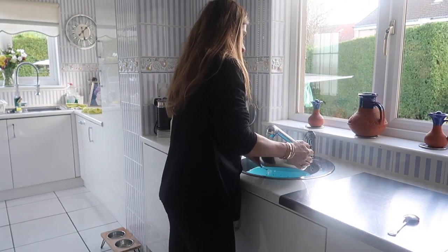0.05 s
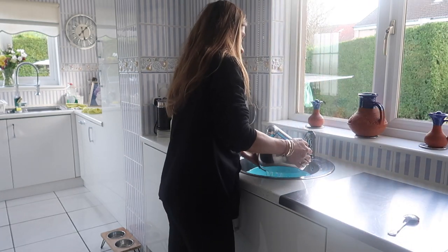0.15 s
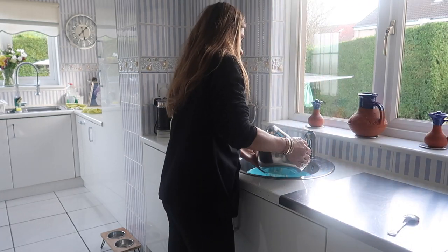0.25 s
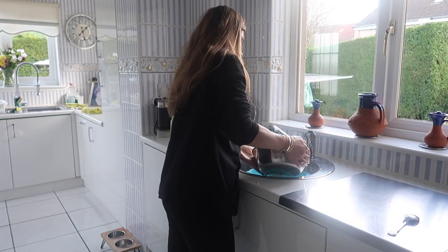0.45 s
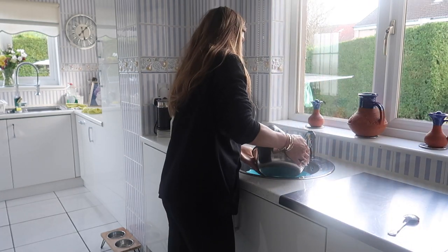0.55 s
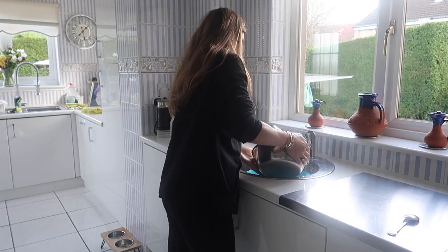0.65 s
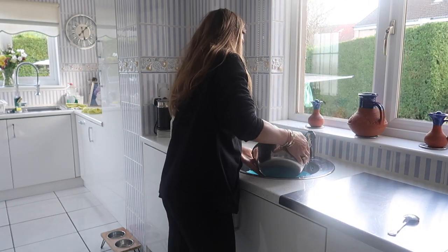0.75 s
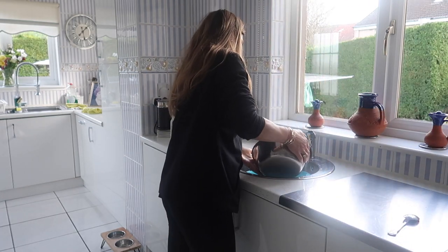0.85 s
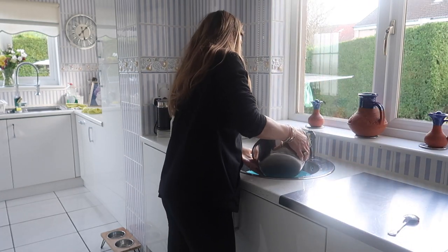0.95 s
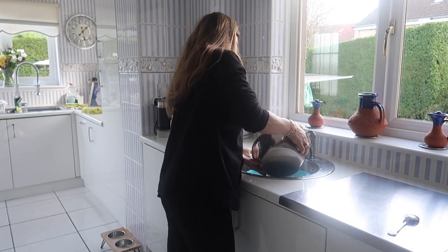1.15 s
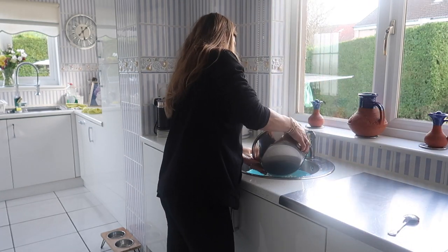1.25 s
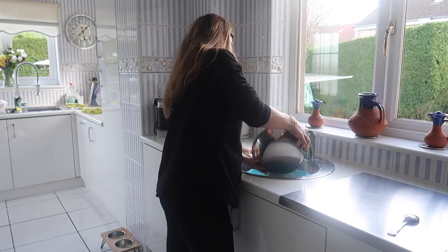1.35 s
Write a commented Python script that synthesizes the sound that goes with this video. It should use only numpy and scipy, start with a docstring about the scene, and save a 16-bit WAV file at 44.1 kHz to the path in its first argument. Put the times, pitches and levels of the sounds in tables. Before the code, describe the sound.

Beans pour with a sudden hard rattle that rings the steel, then thin to sparse knocks while water splashes and eases over the sink floor, with a last tiny tumble; close stereo pickup in a tiled kitchen.

```python
"""A faint mains hum and room noise lie under everything, from the start.
Soaked beans and water are then tipped from a steel bowl into a colander in a kitchen sink: dense knocks,
made of short random pings, ring the steel, while water fizzes, pops and drums on the sink floor.
The beans thin out and the water slowly eases, with a last small tumble of beans near the end.
Close-set microphones hear the bass alike and the treble apart."""
import sys
import numpy as np
from scipy import signal
from scipy.fft import rfft, irfft
from scipy.io import wavfile
from scipy.ndimage import uniform_filter1d, map_coordinates

SR = 44100
rng = np.random.default_rng(int(sys.argv[2]) if len(sys.argv) > 2 else 0)


def voltage_ratio(level):
    """Linear amplitude factor for a level in decibels (scalar or array-like)."""
    return 10 ** (np.asarray(level, float) / 20)


def file_out(sig):
    """Save sig as 16-bit WAV at sys.argv[1]."""
    # one column per channel
    cols = np.atleast_2d(sig).T
    # limit, then scale
    lim = np.clip(cols, -1, 1)
    pcm = np.round(lim * 32767).astype(np.int16)
    wavfile.write(sys.argv[1], SR, pcm)


N = 61739  # length in samples
SURGE_PER_S = 14  # new random levels each second, for slow surges


def unit(x):
    """Scale to rms 1."""
    return x / np.sqrt(np.mean(x ** 2))


def curve(table):
    """Gain over time, drawn through (time [s], level [dB]) points."""
    table = np.array(table)
    return voltage_ratio(np.interp(np.arange(N) / SR, table[:, 0], table[:, 1]))


def shape(table, hz):
    """Gain at a frequency, drawn through (frequency [Hz], level [dB]) points."""
    table = np.array(table)
    return voltage_ratio(np.interp(np.log(hz), np.log(table[:, 0]), table[:, 1]))


def colour(x, table):
    """Make some frequencies louder and others softer, as the table says."""
    hz = np.maximum(np.fft.rfftfreq(len(x), 1 / SR), 1)
    return irfft(rfft(x) * shape(table, hz), len(x))


def walk(per_s):
    """Random levels joined by straight slopes; spread near 1.5."""
    size = SR // int(per_s)
    levels = np.repeat(rng.standard_normal(N // size + 1), size)
    return 1.83 * uniform_filter1d(levels, size)[:N]


def burst(s, length_s):
    """Envelope that starts at s, swells to 1 after length_s and dies away."""
    age = np.maximum(np.arange(N) / SR - s, 0) / length_s
    return np.e * age * np.exp(-age)


def ring(x, hz, t60):
    """One mode, like a small bell: each impulse sets off a tone that falls 60 dB in t60 seconds."""
    pole = np.exp((2j * np.pi * hz - np.log(1000) / t60) / SR)
    return signal.lfilter([1], [1, -pole], x).imag


def impacts(per_s, scatter_db):
    """Random impulses, a few much stronger than the rest, and a lot 0-1 for each."""
    chance = rng.random((N, 3))
    sign = np.sign(chance[:, 1] * 1000 % 1 - .5)
    size = sign * voltage_ratio(-scatter_db * np.log(chance[:, 1] + 1e-9))
    return size * (chance[:, 0] < per_s / SR), chance[:, 2]


def grains(hits, lot, table, cycles, surge_db, count):
    """Every impulse rings for a few cycles at its own pitch; neighbouring pitches surge together."""
    surges = [walk(SURGE_PER_S) for _ in range(count // 8 + 2)]
    out = 0
    for k, hz in enumerate(np.geomspace(table[0][0], table[-1][0], count)):
        # each pitch blends the two nearest surges
        share = k % 8 / 8 * np.pi / 2
        blend = np.cos(share) * surges[k // 8] + np.sin(share) * surges[k // 8 + 1]
        mine = voltage_ratio(surge_db * blend) * hits * ((lot * count).astype(int) == k)
        t60 = np.log(1000) * cycles / (np.pi * hz)
        # ringing twice softens the start; hz ** 2 evens out the level
        ping = ring(ring(mine, hz, t60), hz, t60 / 2)
        out = out + shape(table, hz) * hz ** 2 * ping
    return unit(out)


def modes(hits, table):
    """Every impulse strikes at a new place, so each mode takes its own random share."""
    out = 0
    for hz, db, t60 in table:
        out = out + voltage_ratio(db) * ring(hits * rng.standard_normal(N), hz, t60) / np.sqrt(t60)
    return unit(out)


# tones of the mains hum: (frequency [Hz], level [dB rms])
HUM_TONES = [(50, -56), (100, -59), (297, -52.5)]
# colour of the room noise: (frequency [Hz], relative level [dB])
ROOM_NOISE_COLOUR = [(82, -62), (140, -8), (176, -16), (264, -9.5), (303, -5), (381, -20.5), (2620, -32),
                     (14000, -54)]


def kitchen():
    """Mains hum from steady sines, low rumble from noise through one mode, and coloured room noise."""
    noise_db, rumble_db = -49.5, -61  # rms levels
    t = np.arange(N) / SR
    hum = 0
    for hz, db in HUM_TONES:
        hum = hum + voltage_ratio(db) * np.sqrt(2) * np.sin(2 * np.pi * (hz * t + rng.random()))
    rumble = voltage_ratio(rumble_db) * unit(ring(rng.standard_normal(N), 55.5, 0.043))
    noise = voltage_ratio(noise_db) * unit(colour(rng.standard_normal(N), ROOM_NOISE_COLOUR))
    return hum + rumble + noise


# how hard the beans tumble: (time [s], level [dB])
TUMBLE_LEVEL = [(0.152, -66), (0.158, -42), (0.186, -43.5), (0.204, -15.5), (0.24, -13.5), (0.254, -28),
                (0.263, -12), (0.316, -13.5), (0.33, -15.5), (0.36, -13.5), (0.412, -14.5), (0.422, -14.5),
                (0.602, -16.5), (0.68, -22.5), (0.73, -26.5), (0.758, -24), (1.058, -33), (1.344, -35.5),
                (1.372, -25.5), (1.4, -36)]


def tumble():
    """Strength of the falling beans; it flickers because they leave the bowl unevenly."""
    trickle_db = 0.8  # depth of the flicker
    return curve(TUMBLE_LEVEL) * voltage_ratio(trickle_db * walk(60))


# colour of the bean knocks: (frequency [Hz], level [dB])
BEAN_COLOUR = [(350, -15), (520, -42), (650, -17), (850, -4), (1100, -11.5), (1450, -2), (2050, -5),
               (2700, -11), (3600, -25.5), (4500, -39.5)]


def bean_rattle(hits, lot, push):
    """Dense small knocks, each a ping of a few cycles at its own pitch."""
    return voltage_ratio(-4) * push * grains(hits, lot, BEAN_COLOUR, cycles=6, surge_db=.8, count=40)


# modes of bowl and colander: (frequency [Hz], level [dB], time to fall 60 dB [s])
STEEL_MODES = [(610, -6, 0.52), (687.4, -1.5, 0.21), (794, -7, 0.47), (908, -9, 0.12), (1161, -8, 0.74),
               (1282, -4, 0.18), (1382, 3, 0.22), (1460, 0, 0.53), (1699, -4.5, 0.29), (1841, 1.5, 0.018),
               (2060, -1, 0.041), (2106, -13, 0.54), (3430, -16.5, 0.13)]


def steel(hits, push):
    """The same knocks ring the natural tones of the steel."""
    return voltage_ratio(-6) * modes(hits * push, STEEL_MODES) * np.sqrt(np.mean(push ** 2))


def beans():
    """One shower of random impacts drives both the rattle and the ringing steel."""
    hits, lot = impacts(per_s=3300, scatter_db=1.9)
    push = tumble()
    return bean_rattle(hits, lot, push) + steel(hits, push)


# rush of the water: (time [s], level [dB])
FLOW_LEVEL = [(0.15, -63), (0.19, -57), (0.202, -40), (0.242, -35), (0.25, -38), (0.92, -40),
              (1.244, -44.5), (1.304, -41), (1.318, -43.5), (1.376, -40.5), (1.4, -44)]


def stream():
    """Strength of the running water over time, shared by the drops and the sink floor."""
    return curve(FLOW_LEVEL)


# colour of the water: (frequency [Hz], level [dB])
DROP_COLOUR = [(500, 15.5), (900, 8), (2000, 1.5), (3500, -1.5), (5000, -5), (7000, -11.5), (10000, -20.5),
               (12500, -27), (15000, -35)]


def drops():
    """Fizz of drops and bubbles of many sizes, each ringing briefly at its own pitch."""
    hits, lot = impacts(per_s=14000, scatter_db=1.6)
    return voltage_ratio(7.5) * stream() * grains(hits, lot, DROP_COLOUR, cycles=7, surge_db=0, count=48)


# modes of the sink floor, before the sag: (frequency [Hz], level [dB], time to fall 60 dB [s])
SINK_MODES = [(87.5, -6.5, 0.39), (134.6, -21.5, 0.48), (255.7, -3, 0.21), (431, 5, 0.074)]


def sink():
    """The stream drums on the sink floor and keeps one mode droning; gathering water lowers the pitch."""
    drone_hz, drone_db, flicker_db, waver = 282.6, -1.5, 2.5, .012  # pitch before the sag
    sag_per_s = .09  # share of pitch lost each second
    t = np.arange(N) / SR
    pitch = drone_hz * (1 + waver * walk(SURGE_PER_S))
    drone_level = voltage_ratio(drone_db + flicker_db * walk(SURGE_PER_S))
    drone = drone_level * np.sin(2 * np.pi * np.cumsum(pitch) / SR)
    drum = modes(np.ones(N), SINK_MODES) + drone
    # reading the sound ever more slowly lowers its pitch
    sagging = map_coordinates(drum, [(t - sag_per_s * t ** 2 / 2) * SR])
    return voltage_ratio(3) * stream() * sagging


# clumps of beans: (time [s], level [dB], pitch [Hz], swell [s])
CLUMP_HUMS = [(0.197, -19.5, 1966, 0.0071), (0.199, -21.5, 780, 0.02), (.21, -27, 924, 0.02),
              (.29, -15, 1370, 0.023), (0.339, -13.5, 765.4, 0.022), (0.411, -20.5, 2090, 0.013),
              (0.427, -12, 782.7, 0.02), (0.44, -18.5, 1380, 0.013), (.53, -22.5, 790, 0.021),
              (1.1, -33, 781, 0.13), (1.344, -36, 2097, .018)]


def clumps():
    """Clumps of beans set one mode of the steel humming: a sine that swells, flickers and fades."""
    flicker_db = 2.6
    t = np.arange(N) / SR
    out = 0
    for s, db, hz, swell_s in CLUMP_HUMS:
        level = voltage_ratio(db + flicker_db * walk(60)) * burst(s, swell_s) ** 2
        out = out + level * np.sin(2 * np.pi * (hz * t + rng.random()))
    return out


# loudest splashes: (time [s], relative level [dB], pitch [Hz])
LOUD_SPLASHES = [(0.2346, -19.5, 4110), (0.345, -21.5, 4340), (.476, -28.5, 8030), (0.8194, -33, 5600),
                 (0.8612, -25, 4670), (0.924, -28, 5870), (1.043, -23, 3400), (1.118, -32, 4970),
                 (1.2466, -29.5, 4660), (1.264, -36.5, 7600), (1.292, -31, 4400), (1.3694, -31.5, 5580)]


def splashes():
    """Each splash is a puff of pitched noise with a bubble whose pitch glides up."""
    swell_s, noise_t60_s = 0.0041, .002
    bubble_db, glide_per_s = -3.5, 2.65
    out = 0
    for s, db, hz in LOUD_SPLASHES:
        age = np.arange(N) / SR - s
        glide = 1 + glide_per_s * np.clip(age, 0, 10 * swell_s)
        bubble = voltage_ratio(bubble_db) * np.sin(2 * np.pi * hz * age * glide)
        puff = unit(ring(rng.standard_normal(N), hz, noise_t60_s))
        out = out + voltage_ratio(db - 13.5) * burst(s, swell_s) * (bubble + puff)
    return out


# loudest knocks: (time [s], relative level [dB], pitch [Hz])
LOUD_KNOCKS = [(0.2603, 3.5, 2060), (0.264, 4, 1570), (0.279, 3, 1730), (0.299, 1, 1440), (0.31, 8, 1450),
               (0.365, -8, 1180), (0.422, -6, 1400), (0.469, 2, 1310), (0.481, 1.5, 1460), (0.527, 1, 1770),
               (0.61, 5.5, 1720), (0.701, 0.5, 1410), (0.758, -8, 1560), (.775, -3, 1600),
               (1.046, -18, 1490), (1.369, -15, 980)]


def loud_knocks():
    """The loudest single beans: each a sine that swells and dies within a few cycles."""
    cycles = 4
    t = np.arange(N) / SR
    out = 0
    for s, db, hz in LOUD_KNOCKS:
        envelope = burst(s, cycles / hz / np.pi)
        out = out + voltage_ratio(db - 11.5) * envelope * np.sin(2 * np.pi * hz * (t - s))
    return out


def room(x, t60):
    """Diffuse echo of the tiled kitchen: the sound smeared by a fading tail of noise."""
    t = np.arange(SR // 2) / SR
    tail = rng.standard_normal(len(t)) * voltage_ratio(-60 * t / t60)
    return signal.fftconvolve(x, tail / np.sqrt(np.sum(tail ** 2)))[:N]


# colour of the way from the sink to the microphones: (frequency [Hz], level [dB])
PATH_COLOUR = [(15, -29), (45, -4.5), (150, -3.5), (195, -21.5), (235, -2), (290, -3), (330, -7.5),
               (530, -10), (600, -1), (11000, 2.5), (15000, -10)]


def path(x):
    """The way to the microphones favours some frequencies and dulls others."""
    return colour(x, PATH_COLOUR)


# colour of the side signal, small in the bass: (frequency [Hz], level [dB])
SIDE_COLOUR = [(30, -54), (150, -16), (2500, -22.5), (4000, -4), (7000, 1), (14000, 6.5)]


def side_signal(mid, heard):
    """What differs between the microphones: echoes, spray to either hand and an off-centre sink."""
    echo = voltage_ratio(-3.5) * room(mid, t60=.2)
    spray = voltage_ratio(-13) * path(drops() + splashes())
    lean = voltage_ratio(-0.44 / 2) - 1  # the sink stands a little to the right
    return colour(echo + spray, SIDE_COLOUR) + lean * heard


def scene():
    """Left and right of a close microphone pair, built from a middle and a side signal."""
    background = kitchen()
    poured = beans() + drops() + sink() + clumps() + splashes() + loud_knocks()
    heard = path(poured + voltage_ratio(-8) * room(poured, t60=.3))
    mid = heard + background
    side = side_signal(mid, heard)
    return np.array([mid + side, mid - side])


def low_pass(x):
    """Removes everything above the highest recorded frequency."""
    return signal.sosfilt(signal.butter(12, 15010, fs=SR, output="sos"), x)


def record(dry):
    """The camera softly rounds the loudest peaks."""
    ceiling = .9  # of full scale
    mix = ceiling * np.tanh(dry / ceiling)
    return low_pass(mix)


dry = scene()
out = record(dry)
file_out(out)
```